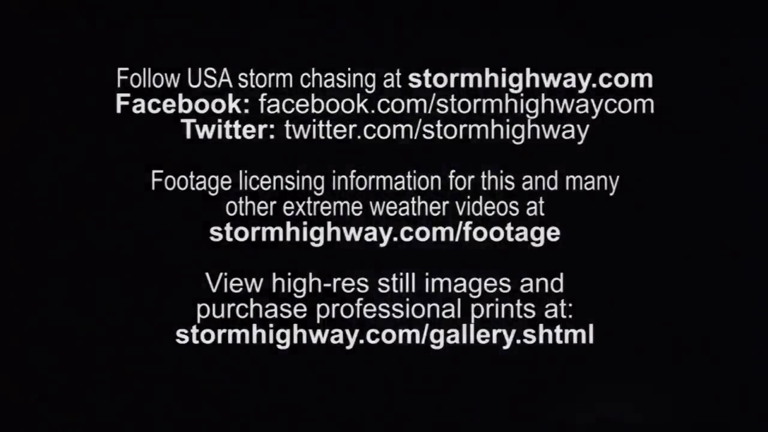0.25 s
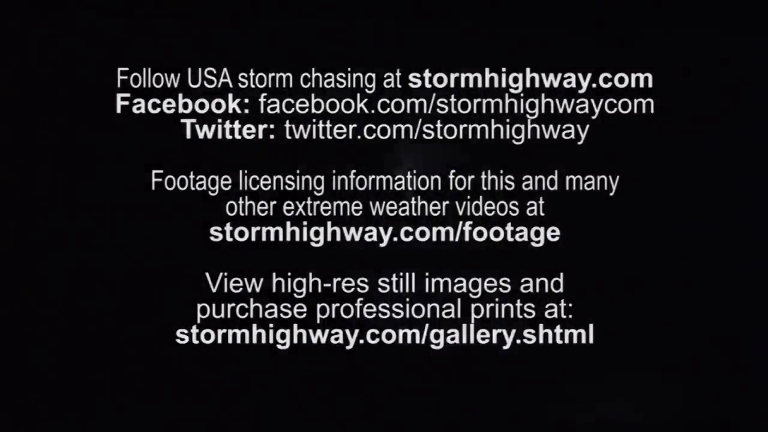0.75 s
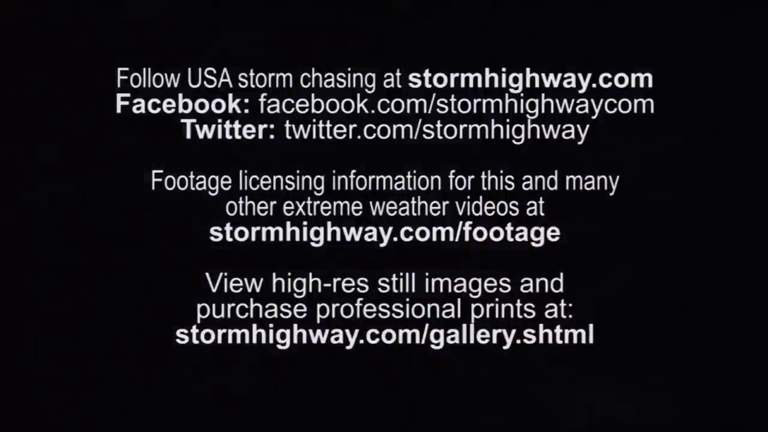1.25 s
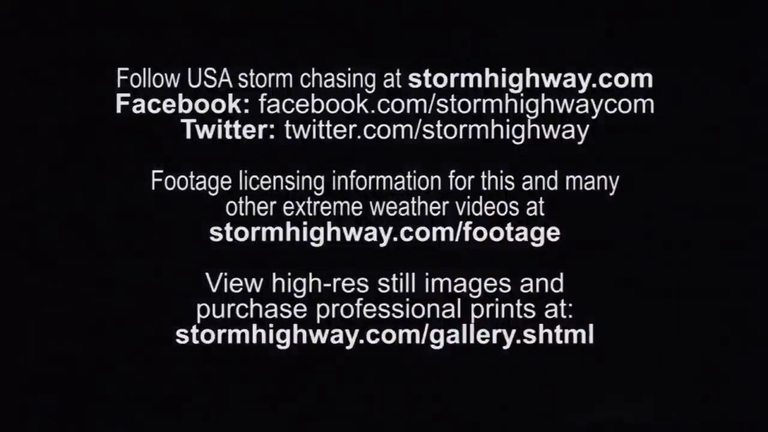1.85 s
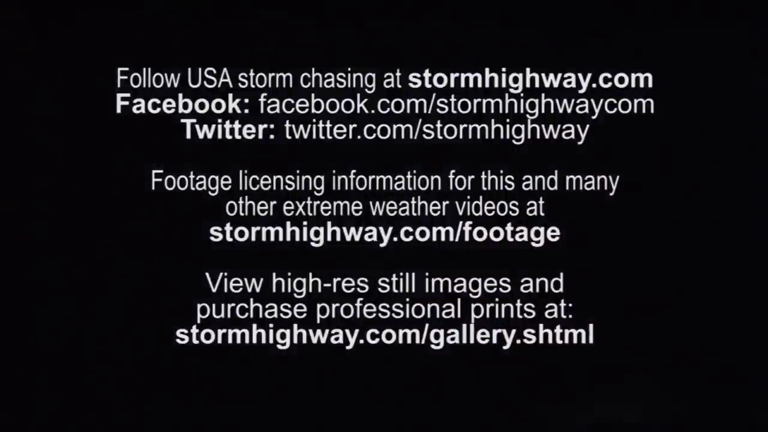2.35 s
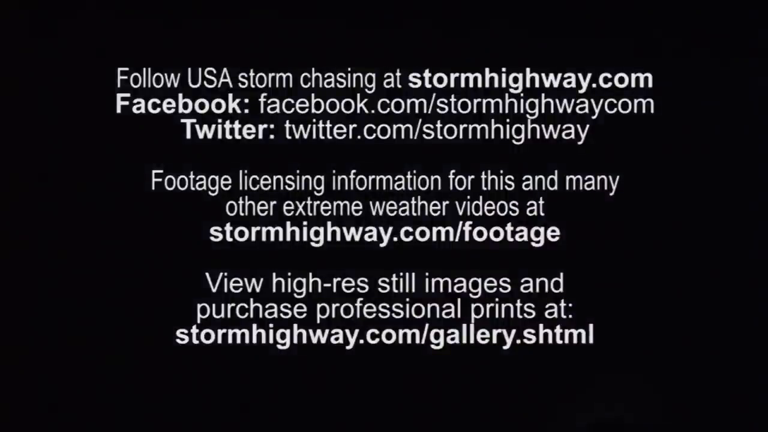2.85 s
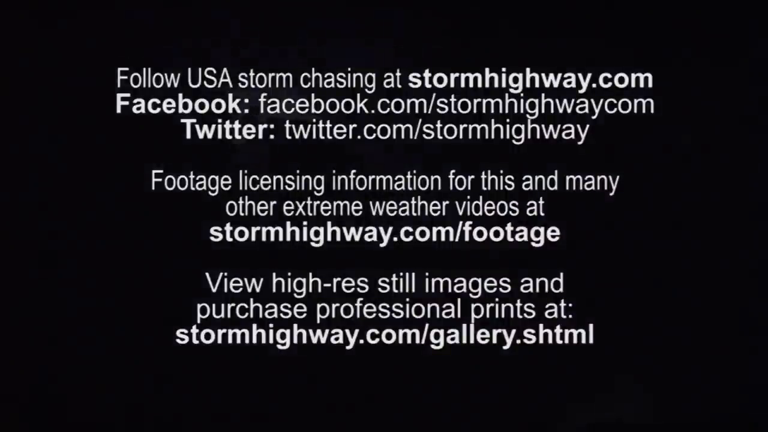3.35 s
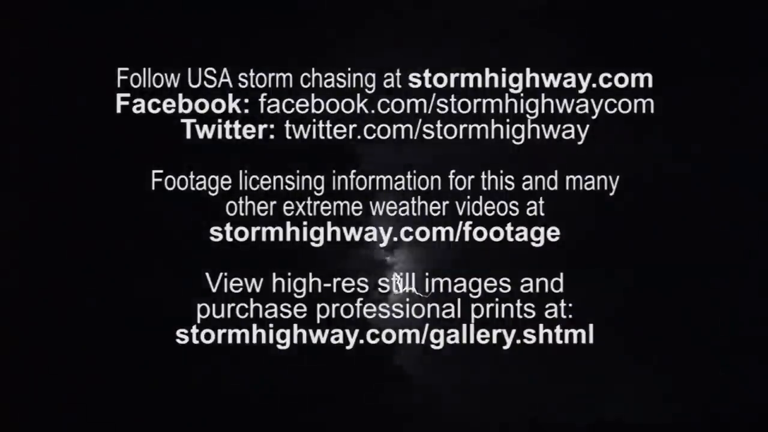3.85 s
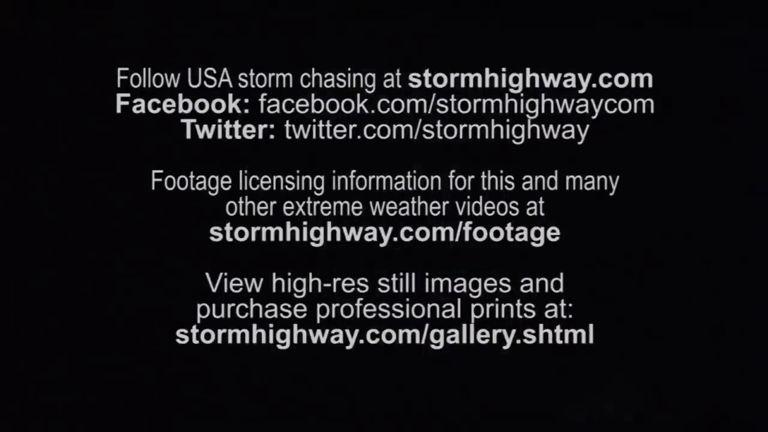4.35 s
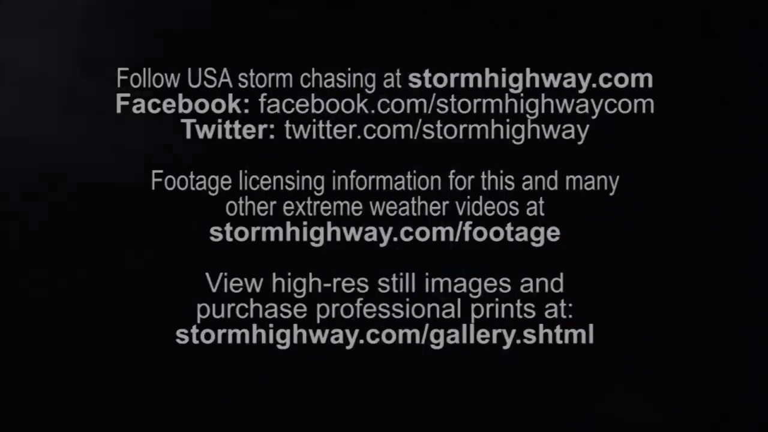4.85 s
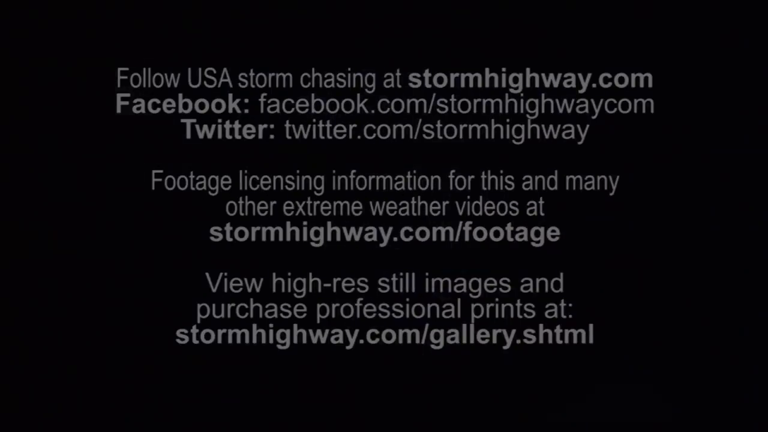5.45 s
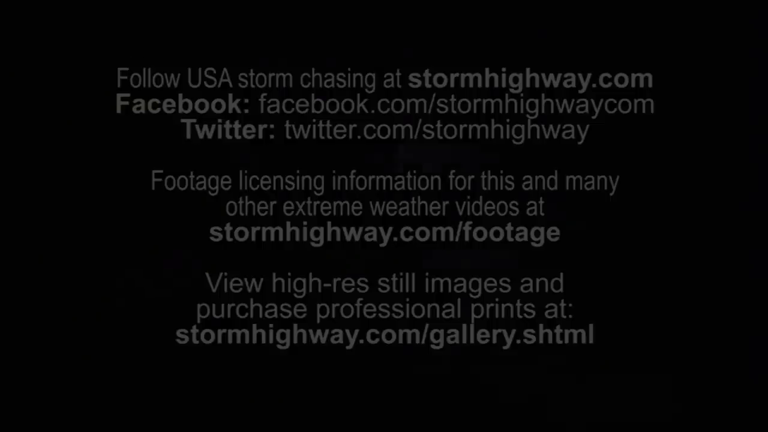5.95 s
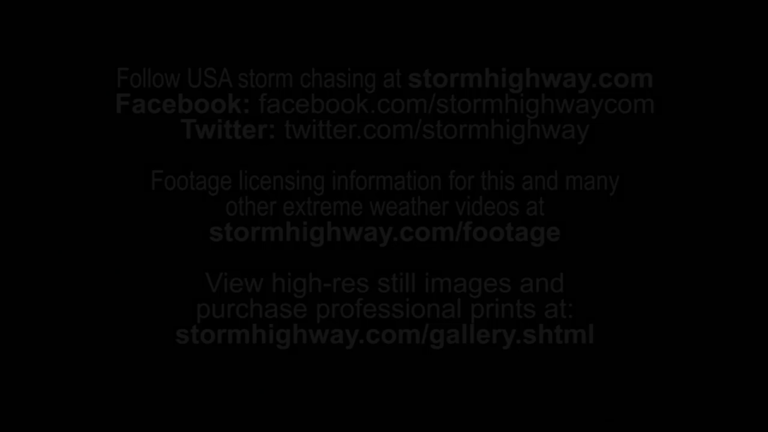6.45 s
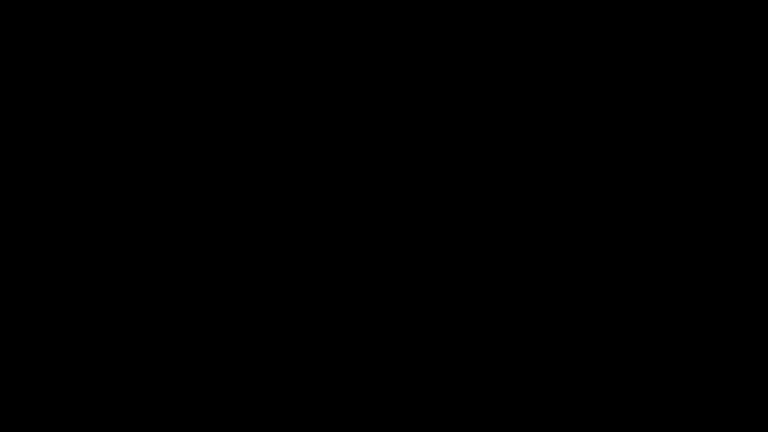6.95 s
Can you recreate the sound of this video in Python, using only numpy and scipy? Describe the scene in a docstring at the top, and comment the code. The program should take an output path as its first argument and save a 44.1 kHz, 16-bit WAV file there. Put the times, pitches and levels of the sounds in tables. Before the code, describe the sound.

Outdoors on a summer night, a low roll of thunder dies away over the mutter of a far storm. Crickets trill, pulse evenly and chirp while katydids buzz very high in a soft hiss. About halfway the roll and trill are gone, and something is handled near the microphone: a scuff, a sharp plastic click, dull bumps. Faint peals follow as the insects fade out.

```python
"""A stormy summer night outdoors. A roll of thunder dies away over the mutter of a far storm.
From the start, in a soft hiss, tree crickets trill and katydids buzz very high; small crickets pulse
evenly and field crickets chirp, all by wing strokes. Near 3.2 s the roll and trill are gone; something
is handled close by: a scuff, a sharp plastic click, dull bumps. Faint peals follow; the night fades out."""
import sys
import numpy as np
from scipy import signal
from scipy.fft import rfft, irfft, next_fast_len
from scipy.io import wavfile
from scipy.ndimage import uniform_filter1d, map_coordinates

SR = 44100
rng = np.random.default_rng(int(sys.argv[2]) if len(sys.argv) > 2 else 0)


def unload_audio(sound):
    """Save the sound as a 16-bit wav file, at the path given as the first command line argument."""
    columns = np.transpose(np.atleast_2d(sound))
    # keep every value between -1 and 1, then stretch to whole-number steps
    steps = np.round(np.clip(columns, -1, 1) * 32767)
    wavfile.write(sys.argv[1], SR, steps.astype(np.int16))


N = 317079
T = np.arange(N) / SR

# Katydid rasp spectrum. Each row: frequency in Hz, relative density in dB.
BUZZ_SPECTRUM = [(7000, -31), (10000, -37.5), (12300, 0.5), (13200, 2.5), (14000, 8.5), (15000, 4),
                 (15800, -19)]
# Wing strokes of a field cricket's chirp. Each row: delay in s, length in s, gain in dB, pitch in Hz.
WING_STROKES = [(-.029, 0.019, -15, 4860), (0, .027, -4.5, 5038), (0.04, 0.027, -3, 5045),
                (0.084, 0.026, -2.5, 5050)]
# Fade of insects, air and hum. Each row: time in s, linear gain.
NIGHT_FADE = [(0, 1), (4.9, 0.94), (5.65, 0.56), (6.45, 0.26), (7.03, 0.0043)]


def amp(db):
    """Decibels to gain."""
    return 10 ** (np.asarray(db) / 20)


def unit(x):
    """Scale to rms 1."""
    return x / np.sqrt(np.mean(x ** 2) + 1e-20)


def curve(rows):
    """One value per sample from (s, value) rows."""
    return np.interp(T, *np.transpose(rows))


def wobble(rate_hz):
    """Smooth random curve, rate_hz knots a second."""
    return map_coordinates(rng.standard_normal(int(N * rate_hz / SR) + 4), [T * rate_hz])


def filtered(x, response):
    """Apply a frequency response, given as a function of Hz."""
    size = next_fast_len(N + 8192)
    return irfft(rfft(x, size) * response(np.fft.rfftfreq(size, 1 / SR)), size)[..., :N]


def coloured(x, spectrum):
    """x shaped by (Hz, dB) points, at rms 1."""
    points_hz, db = np.transpose(spectrum)
    return unit(filtered(x, lambda hz: amp(np.interp(np.log(hz + 1), np.log(points_hz), db))))


def noise(spectrum):
    """Noise of rms 1 with this spectrum."""
    return coloured(rng.standard_normal(N), spectrum)


def patchy(x, depth_db):
    """Each band of a distant wash swells and sinks on its own."""
    bands = signal.stft(x, nperseg=512)[2]
    swell = uniform_filter1d(rng.standard_normal(bands.shape), size=7, axis=-2)
    swell = uniform_filter1d(swell, size=16, axis=-1)
    return unit(signal.istft(bands * amp(depth_db * unit(swell)), nperseg=512)[1][..., :N])


def stereo(mid, side):
    """Left and right from mid and side."""
    return np.array([mid + side, mid - side])


def placed(x, left_db, lead_ms):
    """Off-centre source: level and time lead of left over right."""
    sides = np.array([[.5], [-.5]])
    return amp(left_db * sides) * filtered(x, lambda hz: np.exp(2j * np.pi * hz * sides * lead_ms / 1000))


def add(track, start_s, sound):
    """Mix a sound into a track."""
    start = max(round(start_s * SR), 0)
    part = track[start:start + len(sound)]
    part += sound[:len(part)]


def scatter(x, t60_s):
    """Diffuse echoes from grass and trees, different at each ear."""
    t = T[:SR // 3]
    tail = rng.standard_normal((2, len(t))) * amp(-60 * t / t60_s)
    return signal.fftconvolve(x[None], tail / np.linalg.norm(tail[0]), axes=1)[:, :N]


def thunder():
    """A lumpy roll dies away over deep muttering that swells in peals further off."""
    # Envelopes. Each row: time in s, relative level in dB.
    roll_levels = [(0, -38.5), (1.1, -43), (2.1, -46.5), (2.7, -53.5), (3.15, -67.5)]
    mutter_levels = [(0, -38.5), (1.8, -44.5), (3.1, -58.5), (4.0, -61), (5.4, -63), (6.2, -63.5),
                     (6.75, -73), (7.03, -91)]
    # Spectra of the roll, its faint upper edge and the mutter. Each row: frequency in Hz, density in dB.
    roll_spectrum = [(59, -47.5), (100, -15), (150, 2), (274, -6), (326, -4), (370, -7.5), (563, -13.5),
                     (760, -21.5), (1120, -39), (1300, -54), (1690, -48), (2860, -120)]
    fringe_spectrum = [(700, -16), (1500, -2), (2300, -2), (4000, -1.5), (8000, -35)]
    mutter_spectrum = [(15, -8.5), (32, -1), (60, 2), (95, 0.5), (140, -7), (200, -15), (320, -32.5),
                       (600, -57)]
    # Swells of the mutter. Each row: peak time in s, relative level in dB, half length in s.
    peals = [(0.045, -34, 0.018), (0.654, -39, 0.06), (1.35, -39.5, 0.042), (2.085, -42.5, 0.022),
             (4.257, -59.5, 0.059), (4.45, -55, 0.026), (5.709, -56, 0.038), (5.904, -52, 0.058)]
    roll = stereo(noise(roll_spectrum), amp(-42.5) * noise(roll_spectrum))
    roll += amp(-30) * noise(fringe_spectrum)
    roll *= amp(curve(roll_levels) + 1 + 1.05 * wobble(rate_hz=18))
    roll *= np.clip((roll_levels[-1][0] - T) / 0.065, 0, 1)
    peal_power = sum(amp(db) ** 2 * np.exp(-.5 * ((T - s) / half_s) ** 2) for s, db, half_s in peals)
    mutter_power = amp(curve(mutter_levels) + 1.5 * wobble(rate_hz=12)) ** 2
    mutter = stereo(noise(mutter_spectrum), amp(-19.5) * noise(mutter_spectrum))
    mutter *= amp(-1) * np.sqrt(mutter_power + peal_power)
    mutter *= np.clip((NIGHT_FADE[-1][0] - T) / 0.053, 0, 1)
    return placed(roll + mutter, left_db=-0.45, lead_ms=-.04)


def air():
    """The wide, restless hiss of the night."""
    # Hiss spectra. Each row: frequency in Hz, relative density in dB.
    mid_spectrum = [(100, -1.5), (270, -0.5), (340, -0.5), (410, -1.5), (470, -9.5), (570, -0.5), (790, -6),
                    (910, 2.5), (1100, -6), (1230, 0), (1490, -7.5), (1600, -2.5), (1800, -11.5),
                    (2250, -11.5), (2500, -4.5), (2750, -12.5), (3900, -2), (4300, -18.5), (4850, -6),
                    (5500, -11), (8000, -3), (9600, -9.5), (12000, -4), (15800, -16)]
    side_spectrum = [(100, -8.5), (500, -5), (1600, -13), (1750, -13), (2200, -21), (2500, -3.5),
                     (3200, -26), (4300, -22.5), (4850, -4), (5400, -12.5), (6400, 1.5), (8800, -2),
                     (10300, -14.5), (12000, -11), (15800, -12)]
    mid = amp(-64) * patchy(noise(mid_spectrum), depth_db=1.33)
    side = amp(-61) * patchy(noise(side_spectrum), depth_db=0.5)
    return stereo(mid, side)


def hum(width_hz=13):
    """Faint steady hum: narrow bands of noise under the hiss."""
    # Hum lines. Each row: frequency in Hz, level in dB.
    lines = [(334, -84), (398, -85), (565, -86), (890, -82), (1211, -86.5), (1610, -90.5)]
    response = lambda f: sum(amp(db) / (1 + (2 * (f - hz) / width_hz) ** 2) for hz, db in lines)
    rms = np.sqrt(sum(amp(db) ** 2 for _, db in lines))
    return rms * unit(filtered(rng.standard_normal(N), response))


def stroke(length_s, hz, droop, bend, rough):
    """One wing stroke: the scraper slows along the file, so the tone swells and sags."""
    progress = np.linspace(0, 1, max(int(length_s * SR), 8))
    slip = np.interp(progress, np.linspace(0, 1, 12), rng.standard_normal(12))
    pitch_hz = hz * (1 - droop * progress ** bend + rough * slip)
    swell = np.abs(np.sin(np.pi * progress)) ** 1.18
    return np.sqrt(2) * swell * np.sin(2 * np.pi * np.cumsum(pitch_hz) / SR)


def tree_crickets(stroke_rate_hz=36.2):
    """One unbroken trill in a chorus near 3 kHz; both fall silent about halfway."""
    # Envelope of trill and chorus. Each row: time in s, relative level in dB.
    levels = [(0, -50.5), (.7, -54), (2.26, -60.5), (2.96, -70), (3.2, -84)]
    # Wash of the chorus. Each row: frequency in Hz, relative density in dB.
    chorus_spectrum = [(1000, -31), (1600, -18.5), (1900, -33.5), (2700, -19.5), (2860, -1), (2980, 4),
                       (3100, -1.5), (3300, -8.5), (3600, -14.5), (4000, -22), (4400, -11.5), (4950, -13),
                       (5300, -19), (8000, -35.5)]
    end_s = levels[-1][0]
    song = np.zeros(N)
    for s in np.arange(0, end_s, 1 / stroke_rate_hz):
        gain = amp(rng.normal(0, 1.6))
        start_s = s + rng.normal(0, .0015)
        add(song, start_s, gain * stroke(length_s=0.018, hz=3070, droop=0.1, bend=1.46, rough=0.016))
    trill = amp(-8.5) * placed(unit(song), left_db=0.5, lead_ms=-0.046)
    chorus = patchy(np.array([noise(chorus_spectrum), noise(chorus_spectrum)]), depth_db=1.4)
    return amp(curve(levels) - 2.2) * np.clip((end_s - T) / 0.23, 0, 1) * unit(trill + chorus)


def katydid(stroke_rate_hz, sharpness):
    """Very fast wing strokes, each a puff of high rasp; alternate strokes differ in strength."""
    cycles = np.cumsum(stroke_rate_hz * (1 + .002 * wobble(rate_hz=3))) / SR
    puffs = (.5 + .5 * np.cos(2 * np.pi * cycles)) ** sharpness
    puffs *= 1 + .12 * np.cos(np.pi * cycles)
    return coloured(puffs * rng.standard_normal(N), BUZZ_SPECTRUM)


def katydids():
    """Two buzzers beat against each other over a blur of further ones."""
    near = placed(katydid(stroke_rate_hz=186.2, sharpness=4), left_db=0, lead_ms=0.0016)
    far = placed(katydid(stroke_rate_hz=181.2, sharpness=3), left_db=4.5, lead_ms=-.004)
    blur = np.array([noise(BUZZ_SPECTRUM), noise(BUZZ_SPECTRUM)])
    # Buzz envelope. Each row: time in s, level in dB.
    levels = [(0, -63.5), (.8, -59.5), (3, -61.5), (3.9, -64), (4.6, -62), (7, -63)]
    return amp(curve(levels) + 0.32 * wobble(rate_hz=8)) * unit(near + amp(-4) * far + amp(-0.5) * blur)


def faint_chirps(rate_hz=3, fall_db_per_s=1.6):
    """Random, ever weaker calls of far field crickets, as (s, dB, Hz) rows."""
    slots_s = np.arange(0, N / SR, 1 / rate_hz)
    jitter, spread_db, detune = rng.standard_normal((len(slots_s), 3)).T
    times_s = slots_s + .5 * jitter / rate_hz
    levels_db = -60 - fall_db_per_s * slots_s + spread_db
    pitches_hz = 4880 + 60 * detune
    return np.column_stack([times_s, levels_db, pitches_hz])


def distant_crickets():
    """Far field crickets, their chirps blurred by the vegetation."""
    # The clearest calls. Each row: time in s, relative level in dB, pitch in Hz.
    clear_chirps = [(.16, -57, 4520), (.76, -57, 4900), (.89, -58.5, 4490), (1.21, -59, 4930),
                    (1.30, -58.5, 4520), (1.33, -61, 4950), (1.79, -60, 4900), (2.50, -57, 4870),
                    (3.10, -59, 4870), (4.715, -61, 4900), (5.335, -61, 4940), (6.085, -61, 4880),
                    (6.70, -62, 4900)]
    song = np.zeros(N)
    for s, db, hz in [*clear_chirps, *faint_chirps()]:
        for delay_s, length_s, stroke_db, _ in WING_STROKES:
            tone = stroke(length_s, hz, droop=0.1, bend=2.5, rough=.016)
            start_s = s + delay_s - length_s / 2 + rng.normal(0, .003)
            add(song, start_s, amp(db + stroke_db + rng.normal(0, 1.1)) * tone)
    return amp(1.5) * placed(song, left_db=-2, lead_ms=0.068) + amp(-6.5) * scatter(song, t60_s=0.2)


def small_cricket(bouts, stroke_rate_hz, min_strokes, hz, rough):
    """Evenly spaced chirps; each stroke sweeps down through the wing's resonance."""
    period_s, jitter_s = .237, .0027
    wing_hz, width_hz = 3490, 330
    song = np.zeros(N)
    for first_s, last_s, db in bouts:
        for centre_s in np.linspace(first_s, last_s, round((last_s - first_s) / period_s) + 1):
            strokes = np.arange(min_strokes + rng.integers(2))
            offsets_s = (strokes - strokes.mean()) / stroke_rate_hz
            chirp_db = db + rng.normal(0, 0.73)
            for s in centre_s + rng.normal(0, jitter_s) + offsets_s:
                tone = stroke(length_s=.0165, hz=hz, droop=rng.uniform(.11, .16), bend=1.2, rough=rough)
                add(song, s - len(tone) / SR / 2, amp(chirp_db + rng.normal(0, 1)) * tone)
    return filtered(song, lambda f: 1j * f * width_hz / (wing_hz ** 2 - f ** 2 + 1j * f * width_hz))


def small_crickets():
    """Straight ahead, about four chirps a second; a hoarser neighbour sings along at first."""
    # Bouts of song. Each row: first chirp in s, last chirp in s, relative level in dB.
    lead_bouts = [(.25, 1.5, -56.5), (1.742, 5.222, -62.5), (5.512, 6.935, -61)]
    neighbour_bouts = [(.21, 1.255, -58.5)]
    lead = small_cricket(lead_bouts, stroke_rate_hz=46.5, min_strokes=4, hz=3664, rough=.014)
    neighbour = small_cricket(neighbour_bouts, stroke_rate_hz=43, min_strokes=6, hz=3612, rough=.046)
    neighbour_echo = scatter(neighbour, t60_s=0.09)
    centre_echo = amp(-4.5) * scatter(lead, t60_s=0.13)[0] + amp(-3) * neighbour_echo[0]
    return amp(1) * lead + centre_echo + amp(-6) * neighbour_echo


def field_cricket():
    """A near cricket on the left: a faint lead-in and three full strokes a chirp."""
    # Its calls. Each row: time in s, relative level in dB.
    chirps = [(.585, -46.5), (1.503, -47), (2.161, -47), (2.965, -46.5), (3.835, -46), (4.444, -47),
              (5.184, -47), (6.622, -47)]
    song = np.zeros(N)
    for s, db in chirps:
        for delay_s, length_s, stroke_db, hz in WING_STROKES:
            tone = stroke(length_s, hz, droop=0.12, bend=3.9, rough=0.0015)
            add(song, s + delay_s - length_s / 2, amp(db + stroke_db + rng.normal(0, 0.49)) * tone)
    # Uneven teeth on the file add a faint rasp.
    rasp = amp(-20.5 + 3 * wobble(rate_hz=24)) * noise([(50, -5), (300, -1), (2500, -5), (5000, -28.5)])
    song *= 1 + rasp
    return placed(song, left_db=5.5, lead_ms=0.026) + amp(-12) * scatter(song, t60_s=0.12)


def handling(scuff_s=3.251):
    """Something is handled close by: a brief, grainy scuff and a few dull bumps."""
    # Rubbing noise. Each row: frequency in Hz, relative density in dB.
    scuff_spectrum = [(250, -28.5), (450, -13.5), (750, -1), (930, -14.5), (1150, -2), (1500, -8),
                      (2050, 2.5), (2900, -11), (4300, -19), (5800, -7), (7200, -18), (8000, -18),
                      (10000, -29.5)]
    bump_spectrum = [(60, -2), (200, -5), (600, -3.5), (950, -18.5), (1500, -24), (2300, -21), (5000, -52)]
    # Soft knocks. Each row: peak time in s, level in dB, half length in s.
    bumps = [(3.247, -55.5, 0.0035), (3.586, -61, 0.0044), (3.773, -58.5, 0.0039), (5.391, -70, 0.0074),
             (5.422, -52.5, 0.0013)]
    rub = stereo(noise(scuff_spectrum), amp(-3.5) * noise(scuff_spectrum))
    rub *= amp(2.6 * wobble(rate_hz=250))
    scuff = amp(-50) * np.exp(-np.abs(T - scuff_s) / 0.014) * rub
    bump_envelope = sum(amp(db) * np.exp(-.5 * ((T - s) / half_s) ** 2) for s, db, half_s in bumps)
    return scuff + bump_envelope * noise(bump_spectrum)


def plastic_click(attack_s=0.00056, crack_t60_s=0.014):
    """A plastic part on the left snaps in two steps; each impact is a crack and a very short ring."""
    # Impacts. Each row: start in s, relative level in dB, gain of the low modes in dB.
    impacts = [(3.2876, -33.5, -9.5), (3.2895, -46, 6), (3.3072, -26, -2.5), (3.3204, -52, 7.5)]
    # Modes of the part. Each row: frequency in Hz, gain in dB, 60 dB decay time in s.
    modes = [(2066, 3.5, 0.012), (2350, -8.5, 0.0063), (1810, -14, 0.006), (3350, -6.5, 0.011),
             (4200, -3, 0.01), (5400, -0.5, .006), (5660, 0, 0.0085), (7940, -9.5, .008),
             (9040, -32, 0.0075), (11000, -13, 0.0085)]
    # Dry crack. Each row: frequency in Hz, relative density in dB.
    crack_spectrum = [(300, -14), (1500, -0.5), (6000, 3.5), (7100, -10), (8200, -2), (9700, -9),
                      (11500, 0.5), (15000, -0.5)]
    track, t = np.zeros(N), T[:SR // 20]
    for s, db, low_db in impacts:
        ring = sum(amp(mode_db + low_db * (hz < 2700) - 60 * t / t60_s) * np.sin(2 * np.pi * hz * t)
                   for hz, mode_db, t60_s in modes)
        crack = amp(-7.5 - 60 * t / crack_t60_s) * noise(crack_spectrum)[:len(t)]
        add(track, s, amp(db) * (ring + crack) * (1 - np.exp(-t / attack_s)))
    return placed(track, left_db=4.5, lead_ms=.1) + amp(-15) * scatter(track, t60_s=.03)


def scene():
    """All sources; insects, air and hum fade out together."""
    insects = field_cricket() + distant_crickets() + small_crickets() + tree_crickets() + katydids()
    night = (insects + air() + hum()) * curve(NIGHT_FADE)
    return night + thunder() + plastic_click() + handling()


def record(dry):
    """Brick-wall low-pass."""
    cutoff_hz = 15800
    return filtered(dry, lambda hz: hz < cutoff_hz)


dry = scene()
out = record(dry)
unload_audio(out)
```